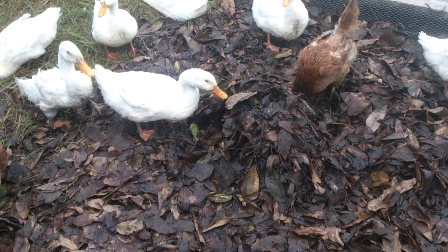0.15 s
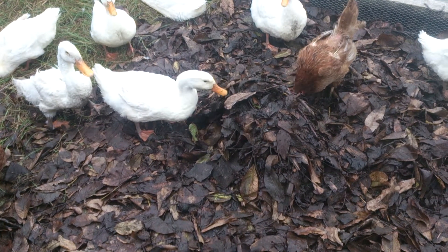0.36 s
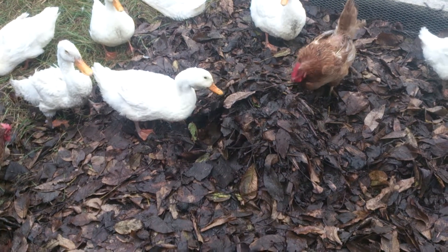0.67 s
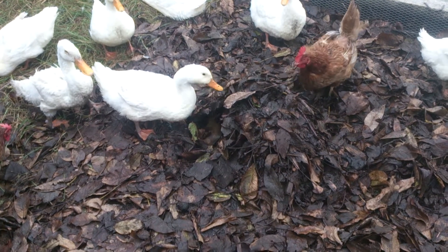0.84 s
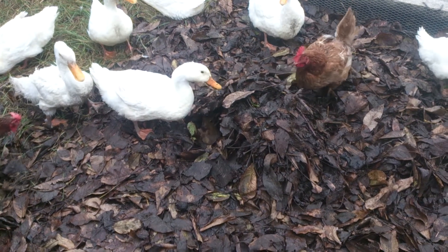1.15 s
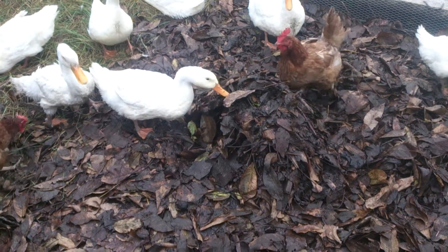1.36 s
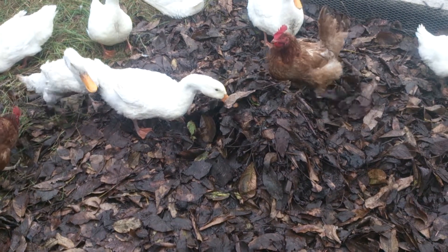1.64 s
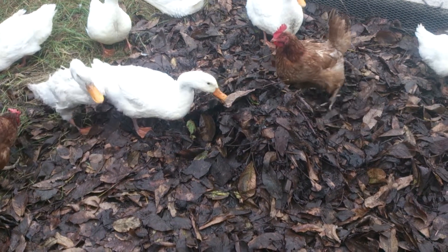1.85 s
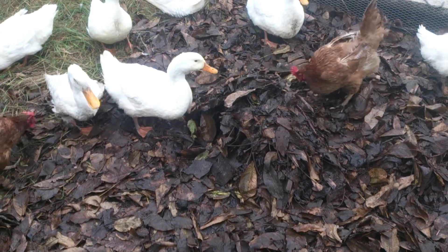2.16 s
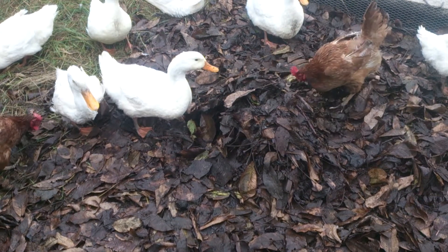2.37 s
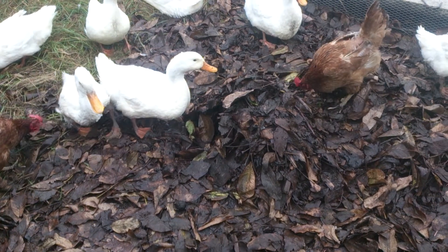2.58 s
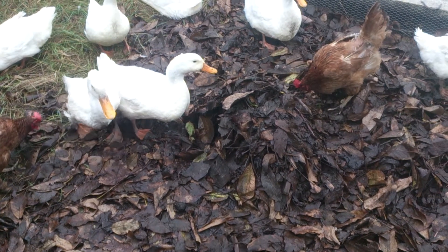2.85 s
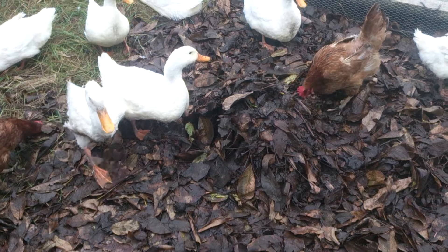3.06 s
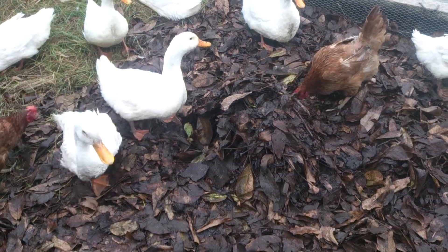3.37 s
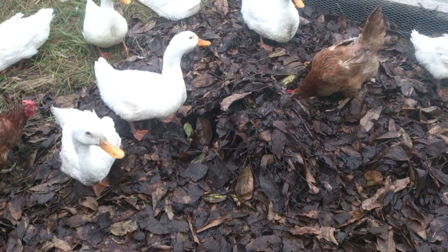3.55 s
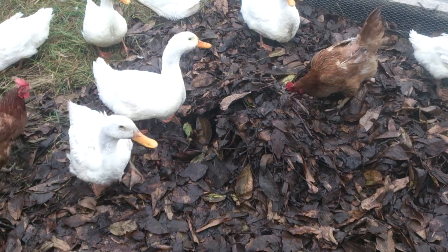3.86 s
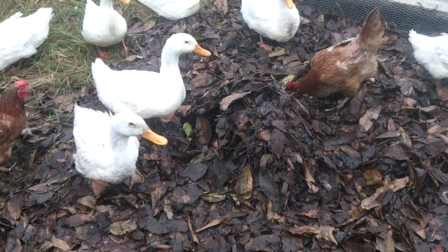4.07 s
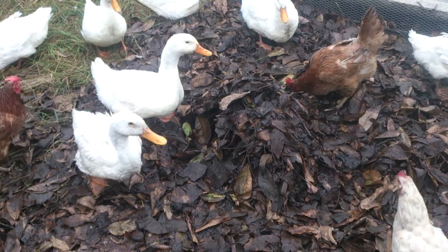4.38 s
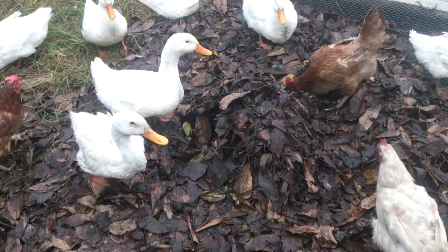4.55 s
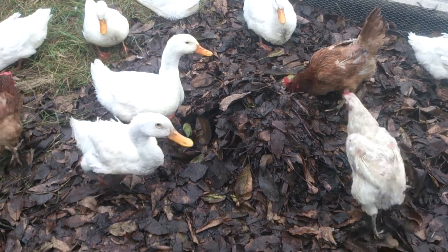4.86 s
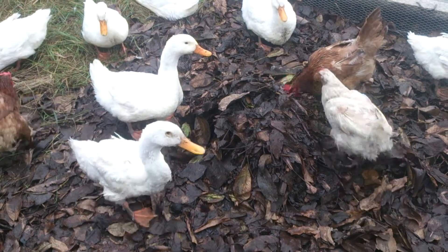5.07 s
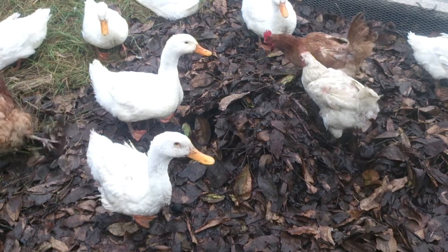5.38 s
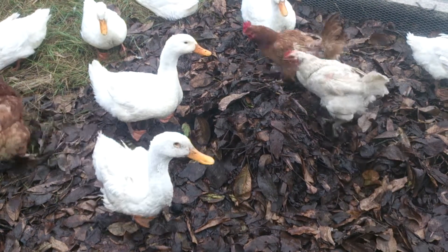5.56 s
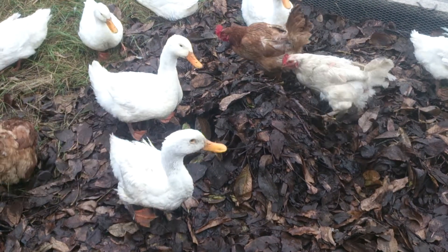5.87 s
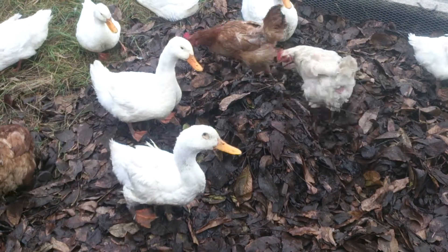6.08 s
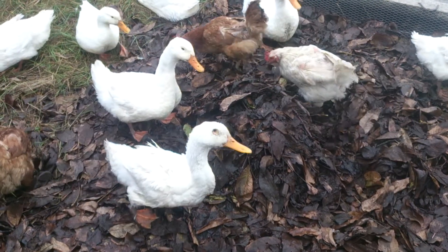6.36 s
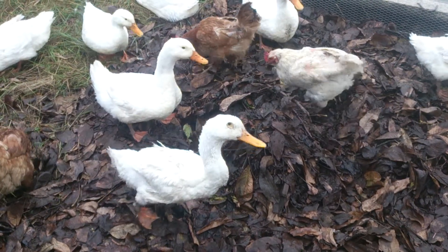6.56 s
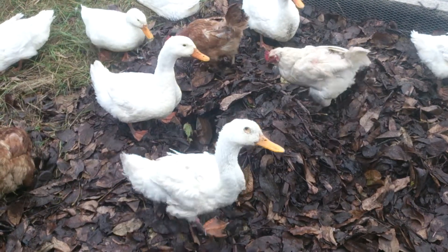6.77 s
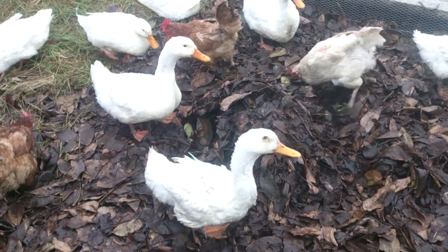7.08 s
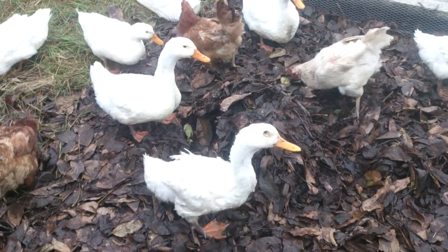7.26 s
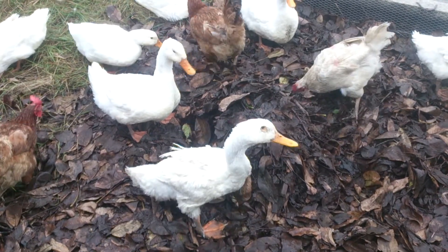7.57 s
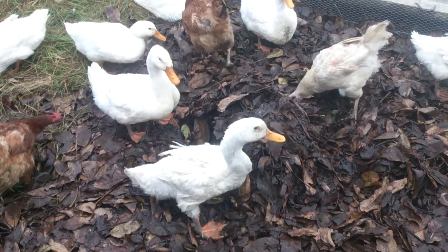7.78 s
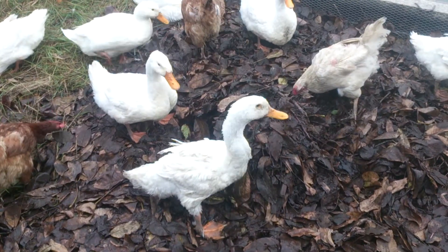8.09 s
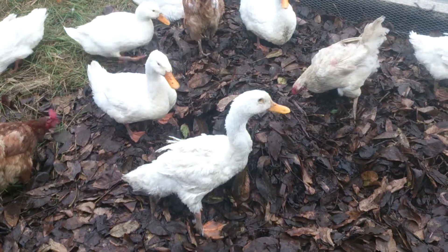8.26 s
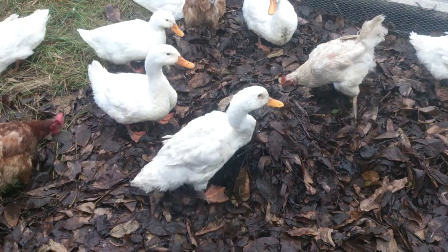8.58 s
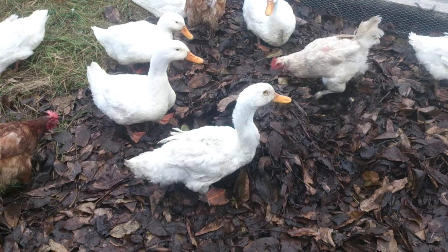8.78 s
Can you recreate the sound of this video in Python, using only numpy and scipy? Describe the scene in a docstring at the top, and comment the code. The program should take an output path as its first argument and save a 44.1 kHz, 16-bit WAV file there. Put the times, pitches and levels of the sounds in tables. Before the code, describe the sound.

A small flock of ducks quacks in overlapping hoarse bursts, close and far, while leaves rustle and a hen clucks softly in a backyard.

```python
"""Ducks and a hen in a backyard

Several ducks quack over each other, two of them close by on the left, and a hen clucks. Each call is a
train of sharp slaps and breath noise, shaped by throat resonances, with noisy rasp from the bill. Leaves
rustle, snap and tick: shaped noise. A far motor and a vehicle in three gears are wavering sine tones.
Two microphone ports stand apart; the right one sits behind a small resonant duct.
"""
import sys
import numpy as np
from scipy import signal
from scipy.fft import rfft, irfft, next_fast_len
from scipy.io import wavfile
from scipy.ndimage import map_coordinates

SR = 44100
rng = np.random.default_rng(int(sys.argv[2]) if len(sys.argv) > 2 else 0)


def transcribe(u):
    """Save the signal u as a 16-bit wav file named by the first command-line argument.

    u: samples, shape (n,) or (channels, n), limited to [-1, 1]; the rate is SR.
    q: integer samples, one column per channel.
    """
    v = np.clip(np.atleast_2d(u).T, -1, 1)
    q = np.round(v * 32767).astype(np.int16)
    wavfile.write(sys.argv[1], SR, q)


N = 393800
TIME = np.arange(N) / SR

# far motor: pitch_hz, level_db, left_minus_right_db
HUM = (40, -53.5, -6)
# a standing low wave reaches the two ports out of step (radians)
LOW_WAVE_SHIFT = np.array([[.5], [-.5]]) * 0.96
# calls of two close ducks on the left, one lower and one near 250 Hz with a tighter throat:
# start_s, length_s, pitch_hz, glide_hz (change over the call), level_db, peak_place (0-1),
# rasp_db (above the voice), upper_db (upper resonances), chest_db (chest tone)
NEAR = [(3.022, 0.069, 221.8, -3, -41, 0.7, -3.5, 0.8, -58),
        (4.342, 0.035, 220.8, -3.5, -39, 0.32, -4.5, 2.5, -47.5),
        (4.645, 0.052, 218.6, 5.5, -34.5, 0.3, -3, 5, -42.5),
        (4.951, 0.056, 247.8, 0, -40.5, 0.13, 1.5, 4, -52.5),
        (5.187, 0.066, 250.2, 0, -33.5, 0.43, -2.5, 2.5, -49.5),
        (5.532, 0.064, 254.7, -6, -33, 0.47, -1.5, 3, -47.5),
        (6.647, 0.028, 212.6, -3.5, -38, 0.287, -8, 1, -48),
        (6.951, 0.049, 213.3, -5.5, -33, 0.29, -8.5, 0.5, -44),
        (7.215, 0.065, 244.1, 31, -53.5, 0.6, -26, 5.5, -73),
        (8.282, 0.057, 230.1, -4.5, -44, 0.34, -3.5, -1.5, -61),
        (8.443, 0.043, 243.2, 0, -40, 0.47, -4.5, -1.5, -46.5),
        (8.682, 0.012, 213.4, 2.5, -50.5, 0.11, -6, 4, -53),
        (8.739, 0.066, 237.8, -15, -37, 0.17, -1.5, 1.5, -41)]
# throat resonances of the leading duck: centre_hz, width_hz, level_db
LEADER_THROAT = [(587, 166, 0.5), (722, 176, 4), (1032, 208, 2), (1360, 230, -5), (2030, 1210, -17)]
# colour of the rasp from an open bill: frequency_hz, level_db
RASP = [(1900, -14.5), (2600, 1), (2900, -2), (3200, 7.5), (3500, -4), (3900, -12.5), (4600, 1.5),
        (5300, -25.5), (5700, 0), (6200, -52), (7300, -2.5), (8800, -43), (9400, -6.5), (12000, -23.5),
        (14000, -27), (16000, -7)]
# loudness shape of each bird's calls: start_db, half_db, end_db (all three under the peak),
# edge_db (extra rasp at both ends)
SHAPES = dict(leader=(1.6, 4.7, 5.4, 3.2), second=(10.7, 4.2, 1.56, 0.37), rising=(4, 0.82, 2.1, 0.086),
          deep=(2.4, 2.2, 13.5, 4.2), honk=(4.5, 7.2, 7.6, 1.4), high=(10, 5.5, 25, 0.059),
          young=(18, 4.2, 2.1, 1.6), hen=(4.8, 1, 1.1, 0.97), near=(2.5, 3.8, 9, 0.068))


def amp(db):
    """Turn decibels into a plain gain."""
    return 10 ** (np.asarray(db) / 20)


def unit(x):
    """Scale a sound to an RMS of one."""
    return x / np.sqrt(np.mean(x ** 2) + 1e-20)


def along(points, hz):
    """Read a curve of (Hz, value) points on a log frequency axis."""
    f, v = np.transpose(points)
    return np.interp(np.log(hz + 1), np.log(f + 1), v)


def level_curve(points):
    """Gain over time from (s, dB) points."""
    return amp(np.interp(TIME, *np.transpose(points)))


def wobble(rate):
    """A smooth random curve with rate knots a second."""
    knots = rng.standard_normal(int(N * rate / SR) + 4)
    return map_coordinates(knots, [TIME * rate])


def filtered(x, response):
    """Multiply the spectrum of x by a response of frequency."""
    m = 2 * next_fast_len(N // 2 + 4096)
    spectrum = rfft(x, m) * response(np.fft.rfftfreq(m, 1 / SR))
    return irfft(spectrum, m)[..., :N]


def through(x, response):
    """Pass x through a causal response cut to 2048 samples."""
    kernel = irfft(response(np.fft.rfftfreq(4096, 1 / SR)))[:2048]
    return signal.oaconvolve(x, kernel)[:N]


def causal(points):
    """Minimum-phase response with a (Hz, dB) colour: it acts only after the sound arrives."""
    def response(hz):
        c = irfft(np.log(amp(along(points, hz))))
        c = c * np.where(np.arange(len(c)) < len(c) // 2, 2, 0)
        return np.exp(rfft(c) - c[0] / 2)
    return response


def swell(calls, levels_db, rise=0.013, fall=0.016):
    """Gain over time: each call fades in before its first row and out after its last (s)."""
    gain = np.zeros(N)
    for call, db in zip(calls, levels_db):
        s = np.array(call)[:, 0]
        knots = np.r_[s[0] - rise, s, s[-1] + fall]
        span = slice(max(int(knots[0] * SR), 0), int(knots[-1] * SR))
        gain[span] += np.interp(TIME[span], knots, np.r_[0, amp(db), 0])
    return gain


def placed(x, lag_s, pan_db, wet_db):
    """Direct sound reaches one port first (right if lag_s > 0); the yard echoes differently at each."""
    # echo decay from fences and walls: frequency_hz, t60_s (time to fall 60 dB)
    yard = [(200, 0.2), (1200, 0.16), (3000, 0.23), (12000, 0.0057)]

    def two_ports(hz):
        lag = np.exp(-1j * np.pi * hz * lag_s * np.array([[1], [-1]]))
        return lag * amp([[pan_db / 2], [-pan_db / 2]])

    direct = filtered(x, two_ports)
    hz, t, z = signal.stft(rng.standard_normal((2, SR // 2)), SR, nperseg=256)
    # long waves are alike at both ports
    shared = along([(250, 0.91), (800, 0.11), (1500, 0.069)], hz)[:, None]
    z[1] = shared * z[0] + np.sqrt(1 - shared ** 2) * z[1]
    decay = amp(-60 * t / along(yard, hz)[:, None])
    tail = signal.istft(z * decay, SR, nperseg=256)[1]
    tail = tail / np.linalg.norm(tail[0])
    late = np.pad(x, (130, 0))[None]  # the echo starts 130 samples later
    wet = signal.fftconvolve(late, tail, axes=1)[:, :N]
    return direct + amp(wet_db) * wet


def air():
    """Open-air background: noise that is more alike at the two ports in the lows."""
    # colour of the air noise: frequency_hz, level_db (per Hz, before the overall level is set)
    air_colour = [(25, 13), (60, -3), (120, -5.5), (300, -9.5), (600, -15.5), (1000, -21), (2500, -20),
                  (5000, -22), (9000, -24), (14000, -22.5), (16000, -30)]

    def mid_and_side(hz):
        alike = along([(60, 0.45), (300, 0.99), (1200, 0.036)], hz)
        split = np.arccos(alike) / 2
        return amp(along(air_colour, hz)) * [np.cos(split), np.sin(split)]

    noise = rng.standard_normal((2, N)) * amp(0.14 * wobble(1.23))
    mid, side = filtered(noise, mid_and_side)
    return amp(-56) * unit(np.array([mid + side, mid - side]))


def far_motor():
    """A far motor hums: one low sine, unsteady in pitch and level."""
    hz, db, _ = HUM
    turn = 2 * np.pi * np.cumsum(hz + 3 * wobble(9.3)) / SR
    return amp(db + 2.3 * wobble(7.7)) * np.sin(turn + LOW_WAVE_SHIFT)


def vehicle():
    """A vehicle's firing tone follows the engine speed, with a weaker tone an octave above."""
    # one list for each gear: time_s, firing_hz, level_db
    gears = [
        [(2.0, 86.53, -78), (2.136, 84.35, -65.5), (2.968, 90.6, -63.5), (3.11, 92.8, -60), (3.9, 99.2, -70)],
        [(4.0, 53.5, -55), (4.31, 57.44, -60.5), (4.43, 56.93, -73), (4.59, 61, -58), (4.96, 63.7, -50.5),
         (5.64, 74, -57), (6.29, 80.9, -57), (6.6, 80.6, -86)],
        [(6.8, 85, -72.5), (7.26, 73.1, -60), (7.318, 74.3, -59.5), (7.7, 71.8, -81)],
    ]
    rows = np.concatenate(gears)
    firing_hz = np.interp(TIME, rows[:, 0], rows[:, 1]) + 3 * wobble(14)
    turn = 2 * np.pi * np.cumsum(firing_hz) / SR
    gain = swell(gears, [np.array(g)[:, 2] for g in gears], 0.085, 0.11)
    tone = np.sin(turn + LOW_WAVE_SHIFT) + amp(-21.0) * np.sin(2.0 * turn)
    return gain * amp(3.5 * wobble(11.0)) * tone


def distance():
    """The motor and the vehicle lean to the same side; the air is all around."""
    pan_db = HUM[2]
    return (far_motor() + vehicle()) * amp([[pan_db / 2], [-pan_db / 2]]) + air()


def rustle():
    """Feet in the litter: a clumpy crackle of noise that swells and fades."""
    # loudness of the rustle: time_s, level_db
    rustle_level = [(0.0, -47), (0.42, -56), (0.92, -51), (1.76, -47), (2.14, -44.5), (2.31, -57),
                    (3.13, -55.5), (3.63, -56.5), (3.93, -46), (4.48, -46), (4.73, -51), (4.95, -54.5),
                    (5.22, -43.5), (5.92, -49), (6.44, -53.5), (6.74, -46.5), (7.46, -54), (8.33, -63),
                    (8.93, -56)]
    # colour of the litter: frequency_hz, level_db (per Hz, before the overall level is set)
    litter = [(1500, -11), (3000, -8.5), (4500, -6.5), (6800, 1), (9000, -6.5), (12000, -5), (14000, -5),
              (16000, 0)]
    grains = rng.standard_normal((2, N)) * amp(3.5 * wobble(15) + 2.3 * wobble(300))
    coloured = filtered(grains, lambda hz: amp(along(litter, hz)))
    return level_curve(rustle_level) * unit(coloured)


def snaps_and_scuffs():
    """Snaps, ticks and dragging feet: dying noise bursts, a crisp part and a body around 4 kHz."""
    # single dry snaps, then a rapid row of evenly spaced ticks from 8.4 s and one last snap:
    # time_s, level_db, body_db (against the crisp part), t60_s (time to fall 60 dB, limited below);
    # both levels before the filters and gains below
    snaps = [(0.9015, -32.5, -43, 0.021), (1.165, -46.5, -8.5, 0.056), (3.036, -41, -9.5, 0.0076),
             (3.169, -36, -18.5, 0.023), (5.483, -75, -23, 0.011), (6.019, -35, -33, 0.027),
             (6.82, -37.5, -18.5, 0.027), (8.4056, -50, -30, 0.023), (8.443, -61, -10, 0.0072),
             (8.4745, -52, -4, 0.013), (8.507, -50, -13, 0.013), (8.5425, -52, -22, 0.012),
             (8.5733, -54, -15, 0.011), (8.6252, -38.5, -14, 0.006)]
    # feet dragged through leaves: time_s, level_db, body_db, t60_s, used as for the snaps
    scuffs = [(1.832, -43.5, -9, 0.074), (1.9065, -47, -1, 0.099), (2.0547, -39, -12.5, 0.1),
              (3.6412, -48, -21, 0.095), (4.0702, -42.5, -12.5, 0.14), (4.257, -43, -19, 0.12),
              (4.831, -43.5, -17.5, 0.077), (5.026, -47, -36, 0.13), (5.074, -50.5, -13, 0.078),
              (5.202, -34, -18, 0.14), (5.988, -44.5, -24, 0.15), (8.606, -53, -33.5, 0.14),
              (8.6795, -46.5, -33, 0.093)]
    crisp, body = np.zeros((2, N + SR)), np.zeros((2, N + SR))
    t = np.arange(SR // 10) / SR
    crackle = unit(amp(4 * wobble(400)))
    for k, (s, db, body_db, t60) in enumerate(snaps + scuffs):
        t60 = np.clip(t60, .004, .12)
        start = round(s * SR)
        envelope = amp(db - 60 * t / t60) * (1 - np.exp(-30 * t / t60))
        burst = envelope * rng.standard_normal((2, len(t)))
        if k >= len(snaps):  # a scuff swells and breaks into grains
            burst = burst * 2 * (1 - np.exp(-t / .012)) * crackle[start:][:len(t)]
        crisp[:, start:][:, :len(t)] += burst
        body[:, start:][:, :len(t)] += burst * amp(body_db)

    def edge(hz):
        return (1j * hz / (6000 + 1j * hz)) ** 2

    def band(hz):
        return 1j * hz * 3500 / (4000 ** 2 - hz * hz + 1j * hz * 3500)

    return amp(10.5) * filtered(crisp[:, :N], edge) + amp(26.0) * filtered(body[:, :N], band)


def knocks():
    """Dull taps on the ground: one soft push each, with little bass and softened highs."""
    # taps: time_s, push_db (strength before the softening filter)
    taps = [(5.480, -20), (6.893, -11.5), (7.272, -15), (7.311, -19)]
    push = np.zeros(N)
    for s, db in taps:
        push[round(s * SR)] = amp(db)

    def dull(hz):
        return 1j * hz / (250 + 1j * hz) / (1 + 1j * hz / 1300) ** 3

    return placed(through(push, dull), 0, 0, -1.8)


def resonances(modes, part=slice(None)):
    """A throat: resonators of alternating sign (or a part of them), dark below the first."""
    def response(f):
        bumps = [(-1) ** k * amp(db) * 1j * f * w / (c * c - f * f + 1j * f * w)
                 for k, (c, w, db) in enumerate(modes)]
        return sum(bumps[part]) * (1j * f / (1.3 * modes[0][0] + 1j * f)) ** 2
    return response


def syrinx(pitch_hz, jitter, rough, double):
    """Voice membranes slap with scatter, more weakly halfway through a cycle, and puff breath noise."""
    phase = 2 * np.cumsum(pitch_hz) / SR  # counts half cycles
    k = np.arange(1, int(phase[-1]))
    chance = rng.standard_normal((N // 32, 2))[k]
    at = np.interp(k + jitter * chance[:, 0], phase, np.arange(N))
    size = np.where(k % 2, 1, double) * amp(chance[:, 1] * (1 + 3 * rough))
    # each slap is a short windowed sinc, so it can fall between two samples
    taps = np.floor(at)[:, None] + np.arange(-7, 9)
    away = taps - at[:, None]
    kernel = np.sinc(away) * np.cos(np.pi * away / 16) ** 2
    index = np.clip(taps, 0, N - 1).astype(int)
    slaps = np.bincount(index.ravel(), (kernel * size[:, None]).ravel(), N)
    puff = signal.lfilter([1], [1, -np.exp(-1 / (.0018 * SR))], np.abs(slaps))  # dies over 1.8 ms
    return unit(slaps), unit(puff * rng.standard_normal(N))


def shaped(rows, shape):
    """Each call as four points (s, pitch Hz, voice dB, rasp dB): start, peak, halfway down, end."""
    start_db, half_db, end_db, edge_db = shape
    drop_db = np.array([start_db, 0, half_db, end_db])
    calls = []
    for s, length, hz, glide, db, peak, rasp_db in np.array(rows)[:, :7]:
        peak = np.clip(peak, .05, .95)
        u = np.array([0, peak, (1 + peak) / 2, 1])
        rasp = rasp_db + edge_db * np.array([1, 0, .5, 1])
        calls.append(np.c_[s + length * u, hz + glide * (u - .5), db - drop_db, rasp])
    return calls


def arched(calls, sag):
    """Pitch over time: an arch, low at the start and drooping at the end, while air pressure is low."""
    droop = np.r_[1, .45, 0, .2, .75, 1.3]
    s, hz = [], []
    for call in calls:
        s.append(np.r_[call[0, 0] - .02, call[:, 0], call[-1, 0] + .03])
        hz.append(np.r_[call[0, 1], call[:, 1], call[-1, 1]] * (1 - sag * droop))
    return np.interp(TIME, np.maximum.accumulate(np.concatenate(s)), np.concatenate(hz))


def opening(calls):
    """The bill opens as a call starts and shuts in the pause after it, 0-1."""
    half_open_s, close_s = .01, .008
    knots = [[c[0, 0] - half_open_s, c[0, 0] + half_open_s, c[-1, 0] + close_s, c[-1, 0] + 2 * close_s]
             for c in calls]
    knots = np.maximum.accumulate(np.concatenate(knots))
    return np.interp(TIME, knots, np.tile([0, 1, 1, 0], len(calls)))


def voice(rows, bird, throat, jitter, rough, double, hiss, sag, bill=RASP):
    """A bird's calls: slaps and breath through the throat, and a noisier rasp from the open bill."""
    shut_drop, bill_shift = .2, .05  # shares: shut throat sits lower; bill resonances drift up and down
    calls = shaped(rows, SHAPES[bird])
    waver = 1 + .01 * wobble(28)  # the membranes never hold a pitch
    slaps, breath = syrinx(arched(calls, sag) * waver, jitter, rough, double)

    def mix(breath_share):
        return np.sqrt(1 - breath_share) * slaps + np.sqrt(breath_share) * breath

    shut_throat = np.array(throat) * [1 - shut_drop, 1, 1]
    wide = opening(calls)

    def throat_sound(part):
        is_open = through(mix(rough), resonances(throat, part))
        is_shut = through(mix(rough), resonances(shut_throat, part))
        return wide * is_open + (1 - wide) * is_shut

    lower, upper = throat_sound(slice(2)), throat_sound(slice(2, None))
    scale = np.std(lower + upper)
    low, high = (through(mix(hiss), causal(np.array(bill) * [1 + way * bill_shift, 1]))
                 for way in (-1, 1))
    drift = .5 + .5 * np.tanh(1.5 * wobble(12))
    rasp = unit((1 - drift) * low + drift * high)
    lower_gain = swell(calls, [c[:, 2] for c in calls])
    upper_gain = swell(calls, [c[:, 2] + row[7] for c, row in zip(calls, rows)])
    rasp_gain = swell(calls, [c[:, 2] + c[:, 3] for c in calls])
    return lower_gain * lower / scale + upper_gain * upper / scale + rasp_gain * rasp


def chatter():
    """Farther ducks mutter in short hoarse bursts: one rough voice with a jumpy level."""
    # loudness of the rest of the flock: time_s, level_db
    chatter_level = [(0.0, -39.5), (0.19, -53), (0.62, -41), (0.75, -48), (0.95, -45.5), (1.64, -45),
                     (1.89, -44), (2.14, -54), (2.34, -39), (2.46, -72), (3.01, -49), (3.53, -53.5),
                     (3.95, -44.5), (4.13, -45.5), (4.66, -53.5), (4.78, -62), (4.92, -54), (5.89, -83),
                     (6.84, -64), (7.71, -60), (8.03, -79.5), (8.3, -57), (8.93, -68.5)]
    slaps, breath = syrinx(255 * amp(.6 * wobble(5)), .05, .4, .4)
    muttering = through(.7 * slaps + .7 * breath, resonances(LEADER_THROAT))
    bursts = amp(3.5 * wobble(11)) * muttering
    return level_curve(chatter_level) * unit(placed(bursts, 0.0001, 0, 0))


def small_birds_and_hen():
    """High-pitched birds and a clucking hen, all set slightly to the right here for simplicity."""
    # calls of a high bird, a young bird and the hen: start_s, length_s, pitch_hz, glide_hz, level_db,
    # peak_place (0-1), rasp_db (above the voice), upper_db (upper resonances)
    high_calls = [(6.132, 0.08, 436.4, -30.5, -51.5, 0.17, -2, 2),
                  (6.312, 0.092, 443.5, -25.5, -49.5, 0.27, -1, 4.5),
                  (6.507, 0.092, 443.6, -28.5, -48.5, 0.36, -2, 3),
                  (6.715, 0.082, 447, -28.5, -48, 0.31, -4, 1),
                  (7.402, 0.061, 483.3, -13.5, -47, 0.398, -1, 3),
                  (8.192, 0.049, 486.6, -8.5, -49.5, 0.19, 2, -24)]
    young_calls = [(6.275, 0.037, 542, 11.5, -51, 0.76, -8, .1),
                   (6.465, 0.04, 542, 2, -51, 0.52, -16, 0.11), (6.85, 0.051, 547, 25, -51, 0.7, -13, 0.12),
                   (7.052, 0.1, 542.5, 17.5, -58.5, 0.094, -7.5, 0.079),
                   (7.325, 0.057, 534, 59, -43, 0.76, -1.5, 0.16),
                   (7.555, 0.075, 522.6, -5, -47.5, 0.32, -4.5, 0.1),
                   (8.262, 0.023, 525, 20.5, -52.5, 0.548, -9, .1),
                   (8.6, 0.036, 553.5, -16.5, -62, 0.98, 1.5, 0.059),
                   (8.862, 0.021, 563.5, -22, -54, 0.097, -10, 0.11)]
    hen_calls = [(5.868, 0.075, 260.2, 15, -52, 0.34, -17, 1.5),
                 (5.96, 0.037, 315.6, -5.5, -56, 0.15, -10, 1),
                 (6.45, 0.066, 345.4, 12.5, -72, 0.32, -16, -8), (7.29, 0.06, 323, 8, -61, 0.67, -6, 4.5),
                 (7.495, 0.15, 331.7, 25, -59, 0.3, -18, 5), (7.72, 0.049, 249, 10, -53, 0.48, -10, 0.5),
                 (7.79, .09, 321, 19, -53, 0.46, -12, 1.5), (8.0, 0.058, 318.2, -20, -61.5, 0.5, -14, 1),
                 (8.43, 0.018, 401, 1, -51, 0.44, -16, 1.5), (8.625, 0.064, 356.6, -2.5, -62, 0.63, -8, -3)]
    # their throat resonances: centre_hz, width_hz, level_db
    high_throat = [(393, 440, -2.5), (1060, 390, 6), (1500, 200, 1), (1906, 213, -5)]
    young_throat = [(590, 330, 3.5), (1060, 420, 6), (1450, 220, -7), (2120, 420, -20)]
    hen_throat = [(262, 19.6, 2), (655, 155, -4.5), (1010, 890, -9.5), (1260, 400, -7.5)]
    # rasp colour of the smaller bills: frequency_hz, level_db
    small_bill = [(1900, -19.5), (2400, -1), (3200, 5.5), (3900, -4), (4500, 8.5), (5200, -12), (7000, 6.5),
                  (9000, -25), (14000, -8), (16000, -20)]
    high = voice(high_calls, "high", high_throat,
                 jitter=.008, rough=.05, double=0, hiss=.07, sag=.19, bill=small_bill)
    young = voice(young_calls, "young", young_throat,
                  jitter=.014, rough=.08, double=0, hiss=.12, sag=.05, bill=small_bill)
    hen = voice(hen_calls, "hen", hen_throat, jitter=.035, rough=.2, double=.1, hiss=.6, sag=.03)
    return placed(high + young + hen, 0.0002, 0.15, -5)


def right_ducks():
    """Ducks on the right quack over each other, from deep and honking to shrill."""
    # calls of each duck: start_s, length_s, pitch_hz, glide_hz, level_db, peak_place (0-1),
    # rasp_db (above the voice), upper_db (upper resonances)
    leader_calls = [(0.212, 0.084, 259.8, -3.5, -41.5, 0.5, -14, -3.5),
                    (0.43, 0.07, 271.2, -10.5, -39, 0.24, -11, -7),
                    (0.552, .15, 266.1, -9, -37.5, 0.39, -6, -5),
                    (2.092, 0.062, 262.6, -7.5, -38, 0.5, -9, -1),
                    (3.66, 0.056, 268, -14, -44, 0.25, -9, 2.5),
                    (4.102, 0.083, 269.5, -14, -40, 0.27, -8.5, -2),
                    (4.49, 0.032, 263, -11, -46, 0.37, -9.5, 1), (4.582, 0.045, 247, -2, -46, 1, -28, -17),
                    (4.86, 0.068, 291.6, 5, -49, 0.95, -13, -8),
                    (5.042, 0.047, 272, -20.5, -46.5, 0.25, -19, -11)]
    rising_calls = [(0.215, .11, 269, -8, -39, 0.29, -6, 0.092),
                    (0.825, 0.054, 266.3, -22, -44.5, 0.14, -1.5, 0.11),
                    (2.002, 0.08, 286.5, 15, -39.5, 0.63, 1, 0.068),
                    (2.165, 0.094, 282.7, 20, -39.5, 0.32, -3, .1),
                    (3.882, 0.088, 287.8, 25.5, -42, 0.375, -1, 0.11),
                    (3.99, 0.039, 283.5, -6.5, -43.5, 0.36, -0.5, 0.098),
                    (4.052, 0.072, 295.8, 21, -41, 0.35, 0.5, 0.11)]
    shrill_calls = [(1.92, 0.057, 307.4, 7.7, -40, 0.42, -15, 0),
                    (2.05, .1, 308.9, 12.7, -42, 0.53, -10, 0),
                    (2.24, 0.064, 305.2, 16, -43.5, 0.9, -10, 0)]
    honk_calls = [(0.375, 0.082, 195.6, -3.5, -31.5, 0.26, -11, -4),
                  (0.782, 0.061, 196.3, -5.5, -30, 0.33, -10.5, -4.5),
                  (1.712, 0.11, 202.2, 8, -31.5, 0.74, -9.5, -3),
                  (1.83, 0.068, 199.1, -4.5, -30, 0.607, -9.5, -5),
                  (1.945, 0.057, 207.9, 0.5, -31, 0.26, -8.5, -6),
                  (2.05, 0.091, 206, 3.5, -39, 0.43, -5, -5.5),
                  (2.285, .065, 202.4, -15.5, -33, 0.41, -12, -3),
                  (2.455, 0.081, 197.2, -15.5, -32, 0.31, -10.5, -3),
                  (3.645, 0.058, 194.2, -11.5, -43.5, 0.53, -7, 0),
                  (3.765, 0.08, 201.4, -13, -38.5, 0.28, -5.5, -1),
                  (4.16, 0.044, 202.5, 1.5, -48, 0.31, -14, 2.5),
                  (4.258, 0.075, 204.3, -15.5, -32.5, 0.39, -8, -4.5),
                  (4.455, 0.061, 196.8, -15.5, -34.5, 0.2, -9, -2)]
    deep_calls = [(0.385, .11, 169.2, -4, -40.5, 0.4, -4, 0), (0.58, .12, 174.3, -3.5, -38.5, 0.35, -8, 0),
                  (1.9, 0.065, 173.1, -8.5, -34.5, 0.23, -4, 0.025),
                  (2.095, 0.067, 172.2, -6, -35.5, 0.21, -12, 0),
                  (2.262, 0.07, 171.4, -4.5, -40, 0.3, -4, 0.0011),
                  (3.8, 0.069, 172.1, -6, -41.5, 0.33, -5, 0.0045),
                  (3.945, 0.056, 170.9, -3, -41, 0.325, -4.5, 0.0037),
                  (4.105, 0.071, 166.8, -6, -38, 0.18, -18, 0),
                  (4.255, 0.041, 174.6, -5.5, -38, 0.25, -6, 0.0061)]
    second_calls = [(0.012, 0.026, 231, -5, -36.5, 0.097, -5.5, 2),
                    (0.092, 0.11, 238, -9.5, -44, 0.27, 0, 7.5),
                    (0.302, 0.032, 257, -7.5, -36, 0.12, -4, 3),
                    (0.462, 0.044, 263, -9, -50, 0.14, -5, -11),
                    (0.912, 0.071, 216.2, 3, -46, 0.62, 2, 6.5),
                    (1.052, 0.096, 242.8, -9.5, -37, 0.23, -3.5, 3),
                    (1.202, 0.074, 242, -7, -40.5, 0.23, -1.5, 5),
                    (1.362, 0.064, 235.2, -3, -36, 0.54, -4.5, 3.5),
                    (1.492, 0.089, 247.6, -4, -36, 0.34, -7, 1.5),
                    (1.652, 0.07, 244.8, 4.5, -37, 0.36, -15.5, -0.5),
                    (2.662, 0.058, 213.9, 0, -41, 0.29, -5, 3.4),
                    (2.812, 0.1, 245.2, -0.5, -41.5, 0.57, -3.5, 4),
                    (2.982, 0.13, 244.8, 9, -46, 0.31, 0.5, 4.5),
                    (3.152, 0.067, 239.6, -6, -44.5, 0.44, -1, 2),
                    (3.272, .11, 241, -10.5, -44, 0.53, -1.5, 3),
                    (3.462, 0.084, 234, 6.5, -41.5, 0.51, -4.5, -0.5),
                    (3.582, 0.033, 233.7, -6.5, -39.5, 0.46, -9, -0.5),
                    (7.6, 0.085, 237.2, -5, -50, 0.32, 0, 4.5),
                    (7.81, 0.06, 238.2, -8.5, -54, 0.3, -0.5, 4.5)]
    # their throat resonances: centre_hz, width_hz, level_db
    rising_throat = [(524, 80, 4), (960, 410, -1), (1078, 62, 14), (1800, 640, -5)]
    shrill_throat = [(605, 140, -3), (900, 200, -6), (1235, 160, 5.5), (1920, 530, -14)]
    honk_throat = [(195, 57, -28), (657, 137, -18.5), (768, 110, 1.5), (1014, 207, -5), (1287, 70, -8),
                   (1960, 660, -17)]
    deep_throat = [(672, 200, -2.5), (915, 202, 1.5), (1022, 74, 6), (1230, 370, -13), (1920, 400, -22.5)]
    second_throat = [(508, 650, -13), (970, 44, 4.5), (1210, 113, -10.5), (1940, 1880, -15.5)]
    # rasp colour of the second duck's bill: frequency_hz, level_db
    second_bill = [(1900, -11.5), (2700, -6), (3200, 0.5), (3700, -2), (4200, 0.5), (4600, -6.5),
                   (5200, -4), (6200, -5.5), (7300, -0.5), (9000, -12), (14000, -14), (16000, -28)]
    ducks = voice(leader_calls, "leader", LEADER_THROAT, jitter=.009, rough=.06, double=.1, hiss=.17, sag=.08)
    ducks += voice(rising_calls, "rising", rising_throat, jitter=.007, rough=.03, double=0, hiss=.2, sag=.08)
    ducks += voice(shrill_calls, "rising", shrill_throat, jitter=.007, rough=.04, double=0, hiss=.2, sag=.04)
    ducks += voice(honk_calls, "honk", honk_throat, jitter=.007, rough=.03, double=0, hiss=.18, sag=.035)
    ducks += voice(deep_calls, "deep", deep_throat, jitter=.007, rough=.04, double=0, hiss=.2, sag=.06)
    ducks += voice(second_calls, "second", second_throat,
                   jitter=.011, rough=.08, double=.5, hiss=.15, sag=.14, bill=second_bill)
    return placed(ducks, 0.00024, 0.16, -7)


def chest():
    """The close ducks' breasts boom at the pitch itself; low notes and soft coos are short sines."""
    # the chest tone peaks late: share_of_call (0-1), level_db (added to the call's chest_db)
    chest_shape = [(0, -11), (.4, -2), (.65, 3.5), (1, -41)]
    # low throaty grunts; the first two rows are the deep fundamental under the honk at 1.7 s:
    # time_s, level_db, pitch_hz
    low_notes = [(1.761, -54, 196.3), (1.831, -55.5, 197), (0.349, -60, 153), (0.434, -54, 149),
                 (0.547, -58, 167), (0.608, -54, 161), (0.97, -61, 136), (1.2, -58, 157),
                 (1.349, -59.5, 156.6), (1.5, -59, 154), (3.8, -54.5, 151.7), (4.115, -54, 171),
                 (4.992, -55, 157), (5.925, -54, 156), (7.55, -78.5, 135), (8.378, -55, 178)]
    # soft notes between quacks: time_s, level_db, pitch_hz
    coos = [(3.235, -62, 396), (3.4, -58, 386), (3.557, -56.5, 389.6)]
    u, shape_db = np.transpose(chest_shape)
    gain = swell([np.c_[c[0] + c[1] * u] for c in NEAR], [c[-1] + shape_db for c in NEAR])
    pitch_hz = arched(shaped(NEAR, SHAPES["near"]), 0.16) * (1 + 0.029 * wobble(40))
    boom = np.sqrt(2) * gain * np.sin(2 * np.pi * np.cumsum(pitch_hz) / SR)
    t = np.arange(SR // 8) / SR
    boom = np.pad(boom, (0, len(t)))
    bump = np.sin(np.pi * np.clip(t / 0.071, 0, 1)) ** 2  # each note lasts 71 ms
    for s, db, hz in low_notes + coos:
        start = round((s - .025) * SR)
        boom[start:][:len(t)] += amp(db) * np.sin(2 * np.pi * hz * t) * bump
    return placed(boom[:N], -0.0001, 0.3, -10)


def near_ducks():
    """Two close ducks on the left with different throats; the pitch of a call tells them apart."""
    # throat resonances of the lower duck and of the tighter-throated one: centre_hz, width_hz, level_db
    near_throat = [(436, 400, -7), (1112, 159, 4.5), (1549.4, 488, -2.5), (2154, 1075, -5)]
    tense_throat = [(330.6, 82, -18), (1222, 97, 5.5), (1706, 112, -4), (2380, 1840, -14.5)]
    # rasp colour of bills turned toward the listener: frequency_hz, level_db
    near_bill = [(1900, -9), (2600, 4.5), (3300, 4), (4000, 6.5), (4600, 4), (5000, 3.5), (5600, 1.5),
                 (7000, 1.5), (9000, -15.5), (14000, -9.5), (16000, -20)]
    tense = [c for c in NEAR if 244 < c[2] < 262]  # pitch in Hz
    loose = [c for c in NEAR if not 244 < c[2] < 262]
    near = voice(loose, "near", near_throat,
                 jitter=.03, rough=.13, double=.1, hiss=.2, sag=.12, bill=near_bill)
    near += voice(tense, "near", tense_throat,
                  jitter=.035, rough=.2, double=.1, hiss=.2, sag=.12, bill=near_bill)
    return placed(near, -0.00016, 0.3, -10)


def scene():
    """Add all the layers, from the background to the close ducks."""
    background = distance() + rustle() + snaps_and_scuffs() + knocks()
    return background + chatter() + small_birds_and_hen() + right_ducks() + chest() + near_ducks()


def record(dry):
    """The right port's duct colours its channel; both fade at the top and stop at the band limit."""
    # colour of the right port's duct: frequency_hz, level_db
    right_port = [(200, 0), (1000, -2), (2000, 1), (3000, -3), (3800, 7), (4500, 16), (5000, 7), (5600, 0),
                  (6500, -9), (9500, -10), (11500, -1), (12200, -11), (12800, -24), (15500, -15)]
    # fading treble of both microphones: frequency_hz, level_db
    capsule = [(13500, 0), (14500, -2), (15800, -11)]
    top_hz = 15830
    ports = np.array([dry[0], through(dry[1], causal(right_port))])
    return filtered(ports, lambda hz: amp(along(capsule, hz)) * (hz < top_hz))


dry = scene()
out = record(dry)
transcribe(out)
```